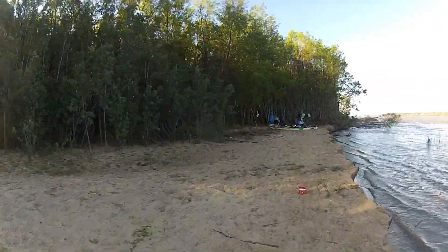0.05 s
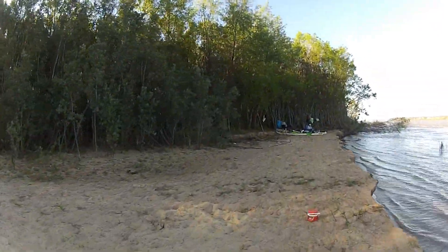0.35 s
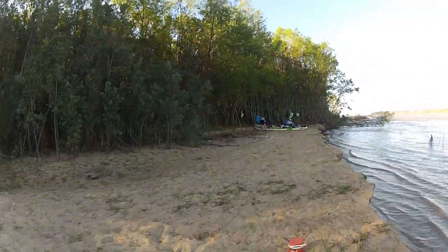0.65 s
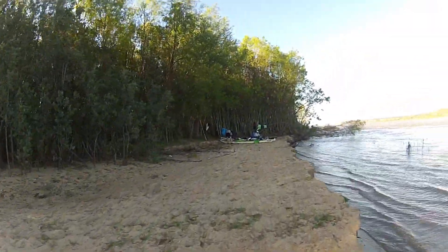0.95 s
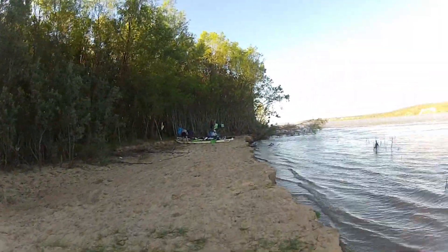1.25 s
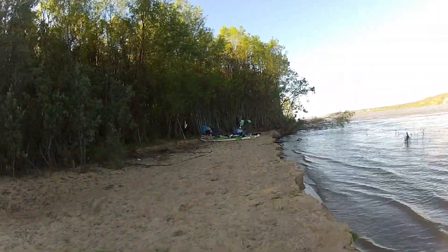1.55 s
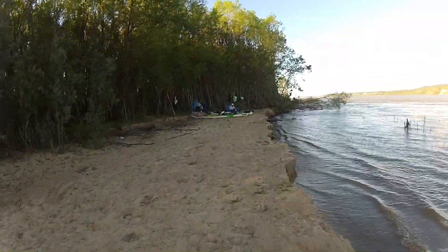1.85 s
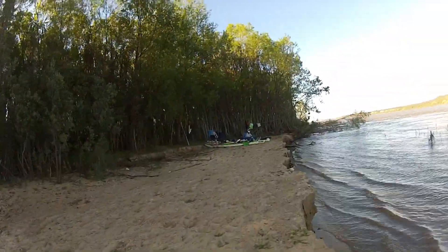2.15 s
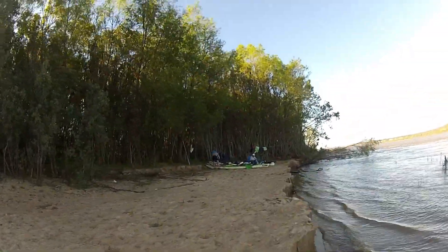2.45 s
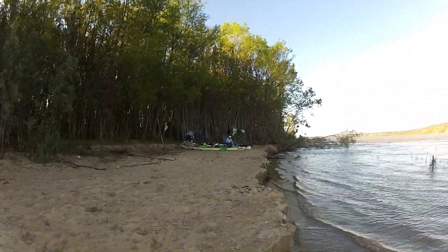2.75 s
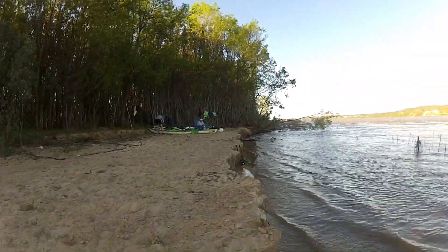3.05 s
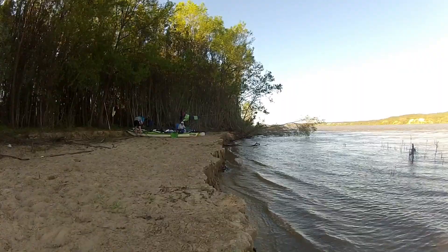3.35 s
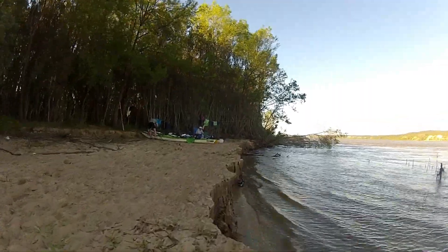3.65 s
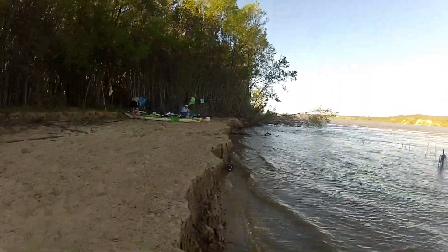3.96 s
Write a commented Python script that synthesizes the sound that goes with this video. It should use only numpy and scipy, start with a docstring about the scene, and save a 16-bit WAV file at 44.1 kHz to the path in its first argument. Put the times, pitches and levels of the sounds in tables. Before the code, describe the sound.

Fingers rub and click on a small camera's case while wind rumbles on the microphone.

```python
"""Wind rumbles on the microphone of a small cased camera, carried by hand along a sandy riverbank.
Soft steps swish in the sand over faintly lapping water, and a loose buckle ticks.
Fingers shift, scrape and click on the plastic case, which rings at its resonances.
The mono recorder samples slowly and holds each sample, mirroring the sound into a gritty treble."""
import sys
import numpy as np
from scipy import signal
from scipy.fft import rfft, irfft
from scipy.io import wavfile
from scipy.ndimage import uniform_filter1d

SR = 44100
rng = np.random.default_rng(int(sys.argv[2]) if len(sys.argv) > 2 else 0)


def wav_out(sig):
    """Save sig, one row per channel (or a flat mono array), as 16-bit PCM at SR to the path in sys.argv[1]."""
    wavfile.write(sys.argv[1], SR, np.round(np.clip(np.atleast_2d(sig).T, -1, 1) * 32767).astype(np.int16))


N = 176400


def undb(db):
    return 10 ** (np.asarray(db) / 20)


def unit(x):
    """Scale to rms 1."""
    return x / np.sqrt(np.mean(x ** 2))


def wander(rate_hz):
    """Smooth random drift, rms 1."""
    span = max(int(SR / rate_hz), 2)
    stairs = np.repeat(rng.standard_normal(N // span + 1), span)
    return unit(uniform_filter1d(stairs, span)[:N])


def colour(x, points):
    """Minimum-phase filter through (Hz, dB) points."""
    hz, db = np.array(points).T
    bins_hz = np.maximum(np.fft.rfftfreq(2 * N, 1 / SR), 1)
    gain = undb(np.interp(np.log(bins_hz), np.log(hz), db))
    cepstrum = irfft(np.log(gain))
    cepstrum[1:N] *= 2
    cepstrum[N + 1:] = 0
    return irfft(rfft(x, 2 * N) * np.exp(rfft(cepstrum)))[:N]


def ring(x, modes):
    """Sum of resonances given as (Hz, width Hz, dB)."""
    return sum(undb(db) * signal.lfilter(*signal.iirpeak(hz, hz / width, fs=SR), x)
               for hz, width, db in modes)


def grains(per_s, scatter):
    """Dense tiny impulses of uneven size."""
    hits = rng.random(N) < per_s / SR
    return hits * np.sign(rng.standard_normal(N)) * np.exp(scatter * rng.standard_normal(N))


def grit(hz, width_hz):
    """Coarse grains in one steep band, rms 1."""
    band = [(hz, width_hz, 0)]
    return unit(ring(ring(grains(per_s=2200, scatter=0.4), band), band))


def snap(t, start, decay, attack_s=0.0005):
    """Click envelope: quick rise, exponential fall."""
    return np.clip((t - start) / attack_s + 1, 0, 1) * np.exp(-np.maximum(t - start, 0) / decay)


def swell(t, peak, rise, fall, shape):
    """Rise-and-fall envelope; a larger shape flattens the top."""
    distance = np.maximum((peak - t) / rise, (t - peak) / fall)
    return np.exp(-np.minimum(distance, 20) ** shape)


# River wash. Each row: frequency in Hz, relative density in dB.
RIVER_SPECTRUM = [(100, 3.5), (500, 12), (900, 3), (2900, -3), (4400, -4.5), (6000, -17.5)]


def river(level_db=-59.5, swell_db=2.75):
    """Faint, slowly swelling wash of water."""
    wash = unit(colour(rng.standard_normal(N), RIVER_SPECTRUM))
    return wash * undb(level_db + swell_db * wander(rate_hz=4.25))


# Wavelets, louder as the walker nears the water. Each row: time in seconds, loudest bubble in dB.
LAPPING_LEVELS = [(0, -69), (3.0, -55), (3.35, -52)]


def lapping(bubbles_per_s=220, low_hz=1400, high_hz=4510, decay_cycles=9, glide=0.024, scatter_db=14.5):
    """Small bubbles ring briefly and rise slightly in pitch."""
    out = np.zeros(N + SR)
    age = np.arange(SR // 20) / SR
    for when, pitch, faintness in rng.random((int(bubbles_per_s * N / SR), 3)):
        hz = low_hz * (high_hz / low_hz) ** pitch
        life = age * hz / decay_cycles
        phase = 2 * np.pi * hz * age * (1 + glide * life / 2)
        db = np.interp(when * N / SR, *np.array(LAPPING_LEVELS).T) - scatter_db * faintness
        start = int(when * N)
        out[start:start + len(age)] += undb(db) * np.exp(-life) * np.sin(phase)
    return out[:N]


# Steps and scuffs. Each row: middle in seconds, half length in seconds, level in dB.
FOOTSTEPS = [(0.956, 1, -64), (2.096, 0.17, -47.5), (2.458, 0.14, -54.5), (2.742, 0.066, -52),
             (2.813, 0.023, -48.5), (2.878, 0.025, -53.5), (2.935, 0.012, -52.5), (3.009, 0.0055, -54),
             (3.231, 0.15, -53.5), (3.488, 0.11, -53.5)]
# Sliding sand. Each row: frequency in Hz, relative density in dB.
SAND_SPECTRUM = [(200, -5), (1250, 2.5), (2100, -3), (2920, 2.5), (3300, -2), (4200, 2), (6000, -11.5)]


def steps(t, patchy_db=1.1):
    """Sand grains slide underfoot in soft, uneven swishes."""
    weight = sum(undb(db) * swell(t, s, half, half, shape=2.2) for s, half, db in FOOTSTEPS)
    sand = unit(colour(grains(per_s=2900, scatter=0.32), SAND_SPECTRUM))
    return sand * weight * undb(patchy_db * wander(rate_hz=55))


# Buckle ticks. Each row: peak in seconds, level in dB.
BUCKLE_TICKS = [(0.015, -50), (.057, -59), (.199, -54), (.256, -53.5), (0.309, -55.5), (0.438, -55),
                (0.472, -56.5), (0.7132, -50.5), (0.7689, -57), (2.3295, -48)]


def buckle(t, rise_s=0.002, fall_s=0.007):
    """A loose buckle jingles in light, gritty ticks."""
    envelope = sum(undb(db) * swell(t, s, rise_s, fall_s, shape=0.73) for s, db in BUCKLE_TICKS)
    return grit(hz=4650, width_hz=1100) * envelope


# Gusts on the microphone. Each row: time in seconds, base level in dB.
GUST_LEVELS = [(0, -36.5), (.07, -35), (.13, -40), (.27, -44), (.36, -40), (.6, -41.5), (1.39, -40),
               (1.46, -29.5), (1.51, -37), (1.55, -29.5), (1.63, -43.5), (1.98, -38), (2.14, -27.5),
               (2.32, -34), (2.44, -31.5), (2.55, -36.5), (2.58, -29.5), (2.62, -39), (3.35, -35.5),
               (3.55, -31), (3.7, -31), (3.745, -26.5), (3.78, -31.5), (3.835, -23), (3.885, -30.5),
               (4, -25.5)]
# Rumble and small eddies. Each row: frequency in Hz, relative density in dB.
RUMBLE_SPECTRUM = [(15, -14.5), (30, -4.5), (55, 0.5), (110, .5), (240, -11.5), (400, -24), (1400, -44),
                   (3000, -62.5), (6000, -52.5)]
EDDY_SPECTRUM = [(40, -12.5), (160, 4), (285, 1.5), (420, -9.5), (750, -21), (1300, -33.5), (6000, -59.5)]


def wind(t, buffet_db=0.94, rumble_gain_db=0.5, eddy_gain_db=-4.5, strong_db=-28.5, eddy_growth=1.78):
    """Air buffets the microphone; in strong gusts small eddies grow faster than the rumble."""
    gust_db = np.interp(t, *np.array(GUST_LEVELS).T) + buffet_db * wander(rate_hz=28.03)
    eddy_db = strong_db + eddy_growth * (gust_db - strong_db)
    rumble = unit(colour(rng.standard_normal(N), RUMBLE_SPECTRUM))
    eddies = unit(colour(rng.standard_normal(N), EDDY_SPECTRUM))
    return rumble * undb(gust_db + rumble_gain_db) + eddies * undb(eddy_db + eddy_gain_db)


# Rasps. Each row: middle in seconds, half length in seconds, band centre in Hz, level in dB.
DRY_RASPS = [(1.943, 0.022, 3700, -44), (1.959, 0.068, 5170, -53), (1.984, 0.014, 4450, -44),
             (2.076, 0.014, 3000, -48), (2.169, 0.016, 3020, -45.5), (3.912, 0.02, 4150, -57.5)]


def rasps(t):
    """Short dry rasps, each in its own band."""
    return sum(undb(db) * grit(hz, width_hz=650) * swell(t, s, half, half, shape=2.6)
               for s, half, hz, db in DRY_RASPS)


# Case clicks. Each row: start in seconds, level in dB, decay in seconds.
CASE_CLICKS = [(0.9456, -34, 0.0042), (.958, -31, 0.0019), (2.2425, -35.5, 0.0082), (2.259, -36.5, 0.0069),
               (2.266, -41, 0.0075)]
# Click colour. Each row: frequency in Hz, relative density in dB.
CLICK_SPECTRUM = [(200, -17), (700, -5), (1200, 15), (2000, -15), (2900, 6.5), (3500, -11.5), (4300, 11),
                  (5100, -0.5), (6000, -33)]


def clicks(t):
    """The case snaps under the grip."""
    envelope = sum(undb(db) * snap(t, s, decay) for s, db, decay in CASE_CLICKS)
    return unit(colour(rng.standard_normal(N), CLICK_SPECTRUM)) * envelope


# Fingertip blows. Each row: start in seconds, force gain in dB, low-pass cutoff in Hz.
FINGER_KNOCKS = [(1.138, 2.5, 950), (1.346, 0, 800), (1.4725, 15, 810), (2.2436, 14, 2280)]
# Low ring of a knock. Each row: frequency in Hz, width in Hz, gain in dB.
KNOCK_MODES = [(680, 45, 3), (1162, 89, -1.5)]


def knocks(t, chatter_db=-22.5, chatter_decay_s=0.0078):
    """A soft fingertip lands on the case and chatters briefly."""
    chatter = undb(chatter_db) * rng.standard_normal(N)
    force = 0
    for s, db, cutoff_hz in FINGER_KNOCKS:
        blow = chatter * snap(t, s, chatter_decay_s)
        blow[int(s * SR)] += 1
        softness = signal.butter(4, cutoff_hz, fs=SR, output="sos")
        force = force + undb(db) * signal.sosfilt(softness, blow + 1e-18)
    return ring(force, KNOCK_MODES)


# Upper case resonances. Each row: frequency in Hz, width in Hz, gain in dB.
CASE_MODES = [(1066, 140, -13.5), (1260, 380, -19), (2390, 24, -18), (2908, 64, -6), (4145, 220, -12),
              (4390, 290, -16)]


def case(force, low_hz, low_width_hz=44, low_db=4.5, leak_db=-21.5):
    """The plastic case rings and passes a little force straight through; grip sets its lowest mode."""
    return ring(force, [(low_hz, low_width_hz, low_db)] + CASE_MODES) + undb(leak_db) * force


def drive(force, db, low_hz):
    """Scale a force so that it rings the case at the given level."""
    return force * undb(db) / np.std(case(force[:SR], low_hz))


# Finger rubs. Each row: peak, rise and fall in seconds, lowest case mode and push centre in Hz,
# push, scrape and squeak levels in dB.
FINGER_RUBS = [ (1.18, 0.039, 0.034, 745, 1090, -43, -47.5, -53.5),
               (1.222, 0.0054, 0.012, 709, 930, -40, -42.5, -53),
               (1.394, 0.048, 0.015, 664, 910, -50.5, -52, -63),
               (1.477, 0.0074, 0.012, 665, 660, -28, -27.5, -27),
               (1.518, 0.0062, 0.031, 670, 990, -52, -49, -51),
               (1.567, 0.0099, 0.013, 659, 990, -33.5, -38, -42),
               (1.597, 0.025, 0.014, 670, 1070, -46.5, -44.5, -35.5),
               (1.666, 0.033, 0.023, 637, 900, -39.5, -42, -79),
               (1.687, 0.0097, 0.026, 660, 970, -41, -35, -37),
               (1.754, 0.062, 0.03, 705, 1240, -49, -50, -50.5),
               (1.803, 0.013, 0.0038, 650, 1060, -48, -41, -41.5),
               (1.855, 0.089, 0.036, 723, 950, -49, -55.5, -60.5),
               (1.937, 0.036, 0.021, 770, 825, -45.5, -44.5, -53.5),
               (1.993, 0.011, 0.009, 678, 640, -27, -38.5, -41.5)]
# Friction forces. Each row: frequency in Hz, relative density in dB.
SCRAPE_SPECTRUM = [(100, -29), (450, 0.5), (660, -2), (850, -9), (1500, -4), (2600, 7.5), (3200, -3),
                   (3800, -2.5), (6000, -11)]
SQUEAK_SPECTRUM = [(2000, -28.5), (3500, 5), (4250, 12.5), (6000, -14)]


def rubs(t, slips_per_s=5000, scatter=0.4, push_q=1.85, patchy_db=1.0):
    """Skin sticks and slips on the case; each rub mixes a dull push, a scrape and a squeak."""
    scrape = colour(grains(slips_per_s, scatter), SCRAPE_SPECTRUM)
    squeak = colour(grains(slips_per_s, scatter), SQUEAK_SPECTRUM)
    drag = grains(slips_per_s, scatter)
    catching = undb(patchy_db * wander(rate_hz=260))
    out = 0
    for s, rise, fall, low_hz, push_hz, push_db, scrape_db, squeak_db in FINGER_RUBS:
        band = [(push_hz, push_hz / push_q, 0)]
        push = ring(ring(drag, band), band)
        force = drive(push, push_db, low_hz)
        force += drive(scrape, scrape_db, low_hz)
        force += drive(squeak, squeak_db, low_hz)
        out = out + case(force * catching * swell(t, s, rise, fall, shape=1.39), low_hz)
    return out


def scene():
    """Wind, river, steps and handling reach one microphone."""
    t = np.arange(N) / SR
    outdoors = wind(t) + river() + steps(t)
    handling = rubs(t) + rasps(t) + clicks(t) + knocks(t)
    mono = outdoors + handling + buckle(t) + lapping()
    return np.array([mono, mono])


ANTIALIAS_HZ, HOLD_HZ, TOP_HZ = 5610, 12000, 15300


def record(dry):
    """Slow sample-and-hold mirrors the sound upward; a steep low-pass cuts the top."""
    length = N + SR
    tail_fade = np.clip((length - np.arange(length)) / SR, 0, 1)
    padded = np.pad(dry, ((0, 0), (0, SR)), mode="reflect") * tail_fade
    band = signal.sosfilt(signal.butter(10, ANTIALIAS_HZ, fs=SR, output="sos"), padded)
    slow = signal.resample(band, length * HOLD_HZ // SR, axis=1)
    held = signal.resample(np.repeat(slow, 4, axis=1), length, axis=1)[:, :N]
    return signal.sosfilt(signal.ellip(10, .2, 80, TOP_HZ, fs=SR, output="sos"), held)


dry = scene()
out = record(dry)
wav_out(out)
```